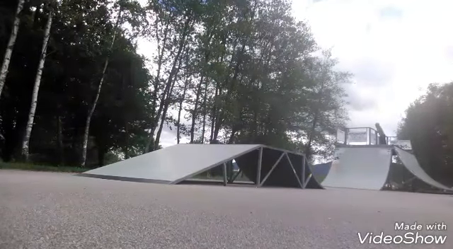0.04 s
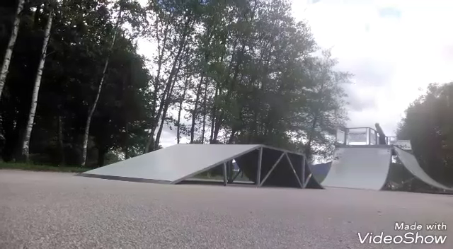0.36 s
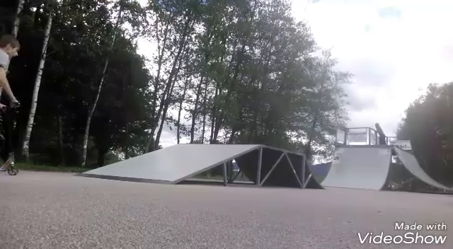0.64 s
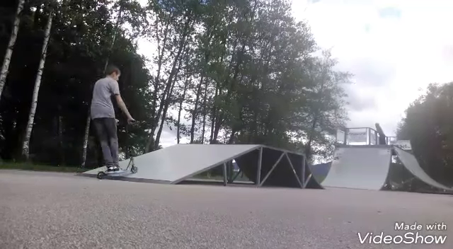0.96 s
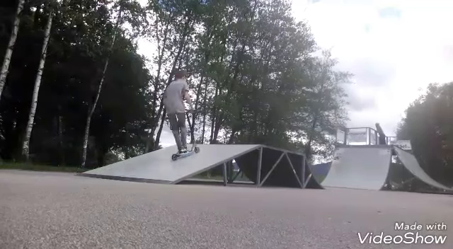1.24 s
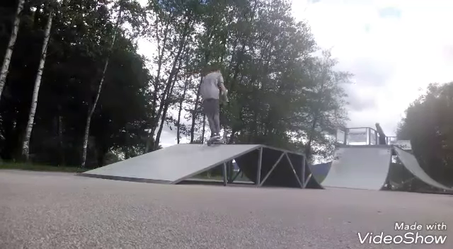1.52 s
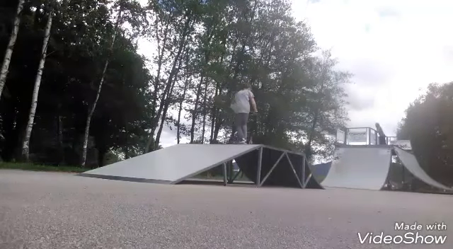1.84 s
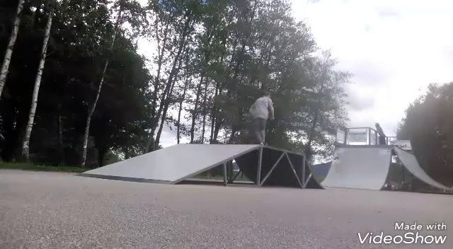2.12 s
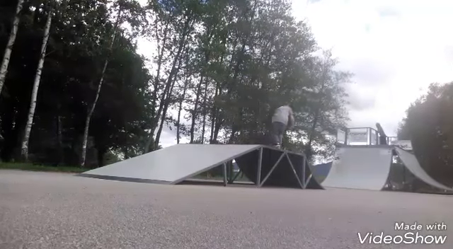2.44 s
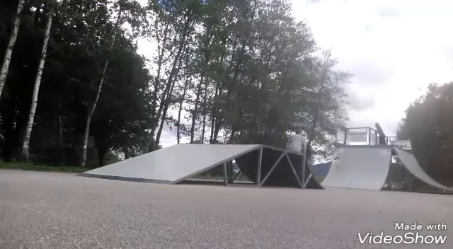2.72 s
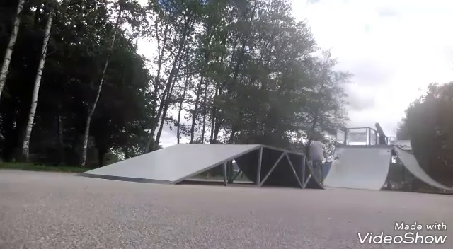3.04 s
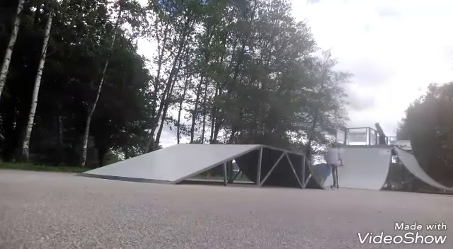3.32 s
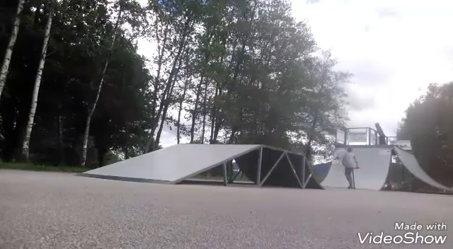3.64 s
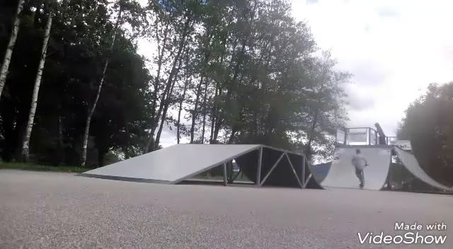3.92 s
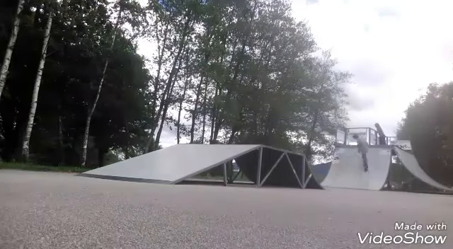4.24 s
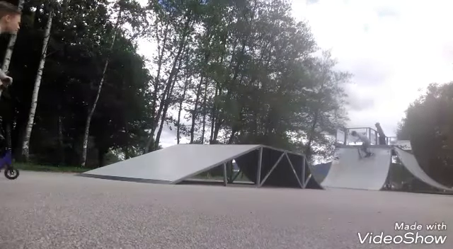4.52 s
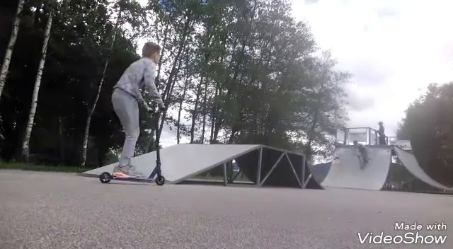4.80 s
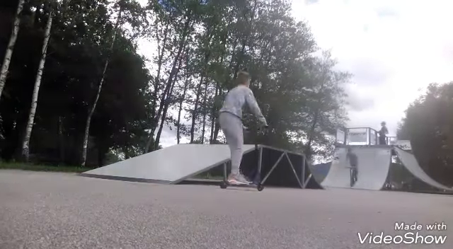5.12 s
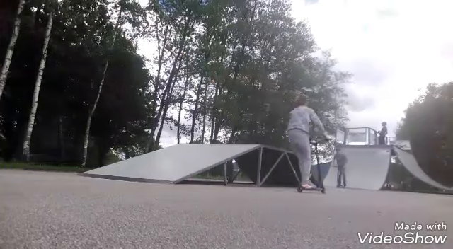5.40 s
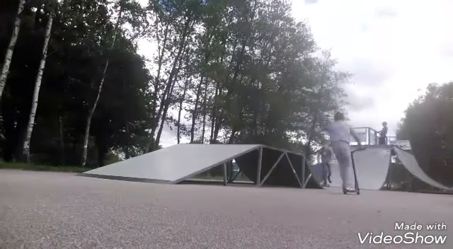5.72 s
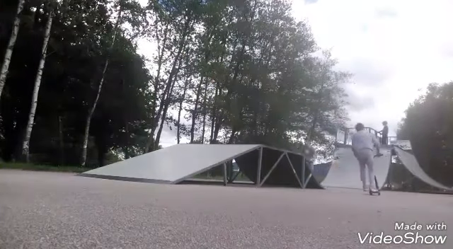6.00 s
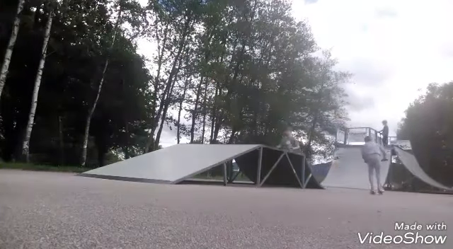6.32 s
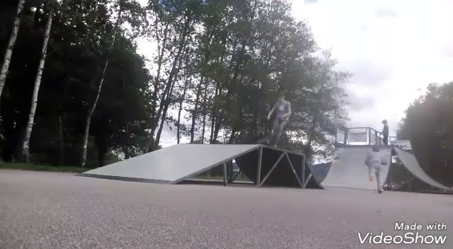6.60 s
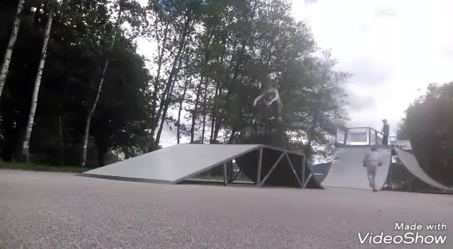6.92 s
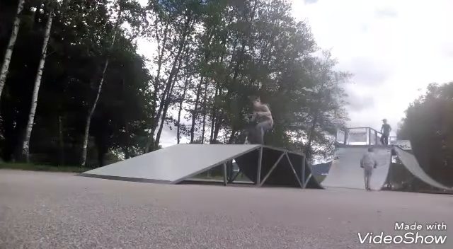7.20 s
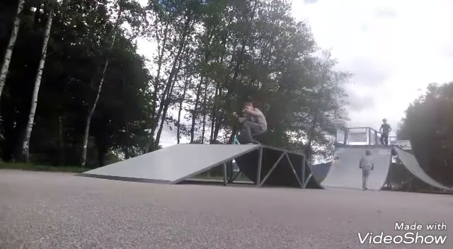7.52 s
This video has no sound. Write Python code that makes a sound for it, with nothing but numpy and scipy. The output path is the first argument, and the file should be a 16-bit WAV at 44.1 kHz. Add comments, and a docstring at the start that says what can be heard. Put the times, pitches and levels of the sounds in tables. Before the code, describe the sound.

Two kick scooters are heard from ground level at an outdoor skatepark, with quiet air and a faint echo. The first swishes in with a rising hiss at about 0.3 seconds and gives a sharp clack at 0.6. Its wheels crunch over grit and drum across a hollow ramp, knocking near 1.4 and 2.1 seconds. A cluster of heavy thuds comes around 3 seconds, then light metal clanks near 3.6. From 4 seconds a low rumble swells, with a sharp snap at 4.5, as the second scooter rolls close by, its loose metal parts rattling brightly on rough asphalt. A ramp booms at about 5 seconds. The rattle thins into a small, high jingle from 5.8 to 6.5 as the scooter leaves. Hollow thuds follow around 6.6, the rolling drops away briefly, and a last landing booms on the ramp at 7.5 seconds.

```python
"""Two kick scooters pass a listener at ground level in an outdoor skatepark.
The first swishes in with a rising sweep, clacks onto a hollow ramp, drums over its panels and
clanks onto a far ramp. From about 4 s the second rolls by close, rough asphalt rattling its
loose metal parts; a washer jingles as it leaves, and a last landing booms in a ramp.
Throughout, grit crunches under the wheels and the trees return a faint echo."""
import sys
import numpy as np
from scipy import signal
from scipy.fft import rfft, irfft, next_fast_len
from scipy.io import wavfile

SR = 44100
rng = np.random.default_rng(int(sys.argv[2]) if len(sys.argv) > 2 else 0)


def pcm_store(signal):
    """Save signal as 16-bit PCM."""
    levels = np.round(np.clip(np.atleast_2d(signal), -1, 1) * 32767)
    wavfile.write(sys.argv[1], SR, levels.astype(np.int16).T)


N = 333351
TIME = np.arange(N) / SR

# shaking of the second scooter on rough asphalt: time_s, level_db
SHAKING = [(4.4, -62), (4.52, -44.5), (4.67, -58), (4.82, -51.5), (5.15, -54), (5.27, -47), (5.65, -55),
           (5.77, -61), (6.0, -51), (6.15, -59.5), (6.27, -54.5), (6.8, -55.5), (7.2, -73.5), (7.5, -61)]
# modes of the ramp panels and of the loose metal parts: pitch_hz, level_db, t60_s
PANEL_MODES = [(55.6, -7.5, 0.45), (80.4, 1, 0.27), (104.2, -0.5, 0.18), (127.7, 0.5, 0.31),
               (159, 1.5, 0.11), (199.3, -0.5, 0.13), (242, -5, 0.18), (296, -6, 0.21), (344, -9, 0.14),
               (413, -8, 0.074), (506, -8, 0.081), (625, -12.5, 0.046), (869, -14.5, 0.04)]
METAL_MODES = [(3215, -6, 0.081), (3680, -10, 0.13), (4570, -2, 0.035), (4783, 0.5, 0.055), (5335, 6, 0.02),
               (5780, 5.5, 0.022), (6450, 3.5, 0.022), (6750, 4, 0.017), (7710, 8, 0.028),
               (8930, 6.5, 0.021), (9400, 1, 0.025), (10390, -2.5, 0.029)]
# spectra of hollow drumming and of a sharp snap: frequency_hz, level_db
DRUM_SPECTRUM = [(90, -13), (170, -3.5), (290, 0.5), (385, 2.5), (470, -2.5), (560, -10), (640, -9),
                 (740, -13), (1000, -11.5), (2000, -53.5)]
SNAP_SPECTRUM = [(800, 1.5), (2400, -5), (4200, -3.5), (5500, 2), (7500, -4.5), (9500, -8.5), (12000, -9.5),
                 (14000, -66.5)]


def gain_of(db):
    """Amplitude grows tenfold for every 20 dB."""
    return 10 ** (np.asarray(db) / 20)


def unit_rms(x):
    """Normalisation to rms 1."""
    return x / np.sqrt(np.mean(x ** 2) + 1e-20)


def unit_peak(x):
    """Normalisation to peak 1."""
    return x / (abs(x).max() + 1e-20)


def value_at(points, hz):
    """Interpolation on a log-frequency axis."""
    known_hz, value = np.transpose(points)
    return np.interp(np.log(hz + 1), np.log(known_hz + 1), value)


def envelope(points):
    """Interpolation of a dB curve into a gain, with exponential decay outside its span."""
    time_s, db = np.transpose(points)
    outside_s = abs(TIME - np.clip(TIME, time_s[0], time_s[-1]))
    return gain_of(np.interp(TIME, time_s, db) - 270 * outside_s)


def add(mix, start_s, sound):
    """Superposition: a sound joins the mix at start_s."""
    part = mix[max(round(start_s * SR), 0):][:len(sound)]
    part += sound[:len(part)]


def colour(x, spectrum):
    """Minimum-phase filtering shapes the spectrum and leaves clicks their sharp front."""
    log_gain = np.log(gain_of(value_at(spectrum, abs(np.fft.fftfreq(4096, 1 / SR)))))
    taps = np.fft.ifft(np.exp(np.conj(signal.hilbert(log_gain)))).real
    return signal.oaconvolve(x, taps[:len(taps) // 2])[:len(x)]


def wander(rate_hz):
    """Low-passed noise: a smooth random drift of rms 1."""
    size = next_fast_len(N, True)
    hz = np.fft.rfftfreq(size, 1 / SR)
    spectrum = rfft(rng.standard_normal(size)) / (1 + (hz / rate_hz) ** 4)
    return unit_rms(irfft(spectrum, size)[:N])


def grains(per_s, spread_db):
    """A Poisson process of clicks of either sign: many small, a few large."""
    size = gain_of(spread_db * np.minimum(rng.exponential(1, N), 3.5))
    return size * rng.choice([-1, 1], N) * (rng.random(N) < per_s / SR)


def burst(t60_s, rise_s=0.00055):
    """A noise transient with a quick rise and exponential decay."""
    t = np.arange(SR // 4) / SR
    return rng.standard_normal(len(t)) * gain_of(-60 * t / t60_s) * (1 - np.exp(-t / rise_s))


def ring(modes, tilt_db=0, scatter_db=2, detune=0.02):
    """Free vibration of damped modes; each contact point weights and tunes them differently."""
    hz, db, t60_s = np.transpose(modes)[:, :, None]
    weight, shift, sign = rng.standard_normal((3, len(modes), 1))
    t = np.arange(SR // 3) / SR
    db = db + tilt_db * np.log2(hz / hz[0]) + scatter_db * weight - 60 * t / t60_s
    return (np.sign(sign) * gain_of(db) * np.sin(2 * np.pi * hz * (1 + detune * shift) * t)).sum(0)


def chink(modes, tick_db, tick_t60_s):
    """Impact of metal on metal: a broadband tick and a short modal ring."""
    tick = unit_peak(colour(burst(tick_t60_s), SNAP_SPECTRUM))
    tone = unit_peak(ring(modes, detune=0.009))
    return unit_peak(tone[:len(tick)] + gain_of(tick_db) * tick)


def shaken(blow, per_s, spread_db, drift_db, drift_hz, contacts=3):
    """Random excitation at several contact points; their strengths drift, so the resonances shift."""
    out = np.zeros(N)
    for _ in range(contacts):
        impacts = grains(per_s, spread_db) * gain_of(drift_db * wander(drift_hz))
        out += signal.oaconvolve(impacts, unit_peak(blow()))[:N]
    return unit_rms(out)


def still_air(level_db=-64.5):
    """Ambient noise: steady, and strongest in the bass."""
    # frequency_hz, level_db
    spectrum = [(25, 8), (60, 8), (250, -19), (600, -18), (1800, -70.5), (7000, -35.5), (13000, -46)]
    return gain_of(level_db) * unit_rms(colour(rng.standard_normal(N), spectrum))


def tree_echo(x, rise_s=0.0013):
    """Scattering from trunks and ramps gives a diffuse tail, each band dying at its own rate."""
    # reverberation times: frequency_hz, t60_s
    decay_times = [(80, 0.56), (500, 0.43), (2000, 0.31), (6000, 0.35), (12000, 0.49)]
    hz, t, noise = signal.stft(rng.standard_normal(SR // 2), SR, nperseg=256)
    decay = gain_of(-60 * t / value_at(decay_times, hz)[:, None])
    tail = signal.istft(noise * decay * (1 - np.exp(-t / rise_s)), SR, nperseg=256)[1]
    return signal.oaconvolve(x, tail / np.linalg.norm(tail))[:N]


def reflections(x, echo_db=-9):
    """Comb filtering: paths off ground and ramps change as the rider moves, so the peaks slide."""
    delays_s = np.geomspace(0.0012, 0.005, 4)
    late = sum(np.interp(TIME - delay * np.exp(0.14 * wander(1.5)), TIME, x) for delay in delays_s)
    return (x + gain_of(echo_db) * late) / np.sqrt(1 + len(delays_s) * gain_of(echo_db) ** 2)


def nearness(nearest_s=5.21, pass_s=0.62):
    """Spherical spreading: the second scooter's gain goes as one over distance, 1 at its nearest."""
    return 1 / np.hypot(1, (TIME - nearest_s) / pass_s)


def wheel_load(start_s, rise_s, hold_s, fade_s=0.088, fade_power=2.45):
    """The load on the wheels rises linearly, holds, then decays by a power law."""
    released_s = np.maximum(TIME - start_s - rise_s - hold_s, 0)
    return np.clip((TIME - start_s) / rise_s, 0, 1) / (1 + released_s / fade_s) ** fade_power


def contact_gains(passing_db=-8, rough_until_s=6.8):
    """Incoherent sources add in power: light rolling, hard stretches and the passing scooter."""
    # light rolling, which stops at take-off: time_s, level_db
    coasting = [(0, -54.5), (.15, -55.5), (1.1, -49), (1.85, -56), (2.0, -51), (2.3, -58.5), (3.9, -55.5),
                (4.6, -51.5), (5.8, -57), (6.85, -60.5), (7.05, -86)]
    # wheels bearing hard: start_s, rise_s, hold_s, hiss_db, crunch_db, drum_db, boom_db, rumble_db
    stretches = [(0.251, 0.24, 0.13, -55, -53.5, -59.5, -61, -72),
                 (1.098, 0.15, 0.055, -56.5, -59.5, -75, -75, -61),
                 (1.336, 0.046, 0.082, -69.5, -74, -55, -56, -53),
                 (1.588, 0.026, 0.11, -66, -68, -61, -75, -48.5),
                 (2.06, 0.014, 0.029, -63.5, -62.5, -50, -55.5, -52),
                 (2.368, 0.076, 0.068, -76.5, -74, -69, -53.5, -42),
                 (2.983, 0.033, 0.2, -61, -58.5, -53.5, -45.5, -51),
                 (3.55, 0.013, 0.3, -72.5, -74, -72, -84, -58),
                 (3.993, 0.59, 0.016, -56.5, -57, -63.5, -47.5, -37.5),
                 (5.045, 0.027, 0.092, -60, -64, -46.5, -49.5, -49),
                 (5.358, 0.25, 0.04, -55, -58.5, -59.5, -48, -58),
                 (6.593, 0.027, 0.15, -63.5, -57, -48.5, -45, -38.5),
                 (7.494, 0.018, 0.039, -53, -57, -45, -53, -39.5)]
    coasting_db = [-38, -27, -11, -13, 0]  # the same five layers
    power = np.outer(gain_of(coasting_db), envelope(coasting)) ** 2
    for start_s, rise_s, hold_s, *layers_db in stretches:
        power += np.outer(gain_of(layers_db), wheel_load(start_s, rise_s, hold_s)) ** 2
    hiss, crunch, drum, boom, rumble = np.sqrt(power)
    passing = gain_of(passing_db) * envelope(SHAKING) * nearness() * (TIME < rough_until_s)
    return hiss, np.hypot(crunch, passing), drum, boom, rumble


def rolling(rumble_db=-5, deck_db=-7.5, frame_db=-3, boom_db=-1, crunch_db=-2, hiss_db=1):
    """Roughness excitation: stones shake ground, deck, frame and panels; grit crunches and hisses."""
    # spectra of the ground and of coarse and fine grit: frequency_hz, level_db
    rumble_spectrum = [(20, -49.5), (33, -13.5), (48, 5.5), (62, 3), (90, -0.5), (130, -11.5), (190, -18.5),
                       (600, -81)]
    crunch_spectrum = [(450, -7.5), (900, 0), (1500, 0.5), (2100, -5.5), (2650, -5.5), (3400, -13.5),
                       (6000, -42)]
    hiss_spectrum = [(1200, -23), (2600, -2), (3300, -3.5), (4150, -0.5), (4900, -3), (5700, -1.5),
                     (6700, 3), (7700, 0.5), (8700, -7.5), (10500, -15.5), (12000, -20), (14000, -60)]
    # hollow tones of the frame: pitch_hz, level_db, t60_s
    frame_modes = [(165, -0.5, 0.12), (272.8, 0.5, 0.071), (387.8, -4, 0.16), (540.3, -6.5, 0.081),
                   (717, -3.5, 0.08), (1014, -10.5, 0.073)]
    bumps = gain_of(4.5 * wander(12))
    flutter = gain_of(1.6 * wander(45))
    hiss_gain, crunch_gain, drum_gain, boom_gain, rumble_gain = contact_gains()
    rumble = unit_rms(colour(grains(400, 4.7), rumble_spectrum) * bumps) * rumble_gain
    deck = unit_rms(colour(grains(700, 4.6) * np.sqrt(bumps), DRUM_SPECTRUM))
    frame = shaken(lambda: ring(frame_modes, scatter_db=3.5, detune=0.036),
                   per_s=200, spread_db=4, drift_db=6, drift_hz=5.4)
    drum = (gain_of(deck_db) * deck + gain_of(frame_db) * frame) * drum_gain
    boom = shaken(lambda: ring(PANEL_MODES, scatter_db=3, detune=0.037),
                  per_s=70, spread_db=3, drift_db=3.8, drift_hz=5.5) * boom_gain
    crunch = unit_rms(colour(grains(1500, 3.7), crunch_spectrum) * flutter) * crunch_gain
    hiss = unit_rms(colour(grains(6000, 4), hiss_spectrum) * flutter) * hiss_gain
    grit = reflections(gain_of(crunch_db) * crunch + gain_of(hiss_db) * hiss)
    return gain_of(rumble_db) * rumble + drum + gain_of(boom_db) * boom + grit


def wheel_swishes(taper=0.44):
    """Narrow-band noise has a pitch: gliding bands of wheel noise give swishes, hums and whines."""
    # start_s, length_s, first_hz, last_hz, level_db, width_hz
    swishes = [(0.298, 0.2, 1258, 1680, -51.5, 200), (0.33, 0.36, 2900, 3700, -60, 600),
               (0.41, 0.12, 4300, 4000, -61, 450), (0.359, 0.35, 440, 500, -61, 130),
               (0.423, 0.14, 1300, 1613, -49.5, 710), (0.45, 0.149, 1800, 2020, -55, 160),
               (0.03, 0.84, 320, 375, -63.5, 45), (0.34, 0.49, 2740, 2486, -73, 350),
               (1.608, 0.18, 1040, 805, -55.5, 230), (1.607, 0.18, 2600, 2000, -63, 2200),
               (2.12, 0.16, 7200, 6900, -72, 2200), (2.38, 0.28, 7200, 7000, -77, 2100),
               (2.3, .62, 3520, 3700, -87.5, 240), (4.122, 0.212, 333, 240, -55.5, 44),
               (4.316, 0.15, 379.6, 300, -55, 21), (5.355, 0.29, 1523, 1682, -59, 420)]
    out = np.zeros(N)
    for start_s, length_s, first_hz, last_hz, db, width_hz in swishes:
        hz = np.linspace(first_hz, last_hz, round(length_s * SR))
        noise = rng.standard_normal(2 * SR) + 1j * rng.standard_normal(2 * SR)
        lowpass = signal.butter(2, width_hz / 2, fs=SR, output="sos")
        baseband = signal.sosfilt(lowpass, noise)[SR // 2:][:len(hz)]
        band = unit_rms((baseband * np.exp(2j * np.pi * np.cumsum(hz) / SR)).real)
        add(out, start_s, gain_of(db) * band * signal.windows.tukey(len(hz), taper))
    return out


def wheel_dips(bump_hz=72, length_s=0.054):
    """A forced pulse without ring: a wheel drops into a dip and pushes for a few low cycles."""
    # start_s, level_db
    bumps = [(0.093, -48.5), (1.125, -39.5), (1.428, -43), (1.989, -41.5), (2.493, -38.5), (2.545, -39.5),
             (2.85, -39.5), (3.295, -37), (7.425, -46.5)]
    out = np.zeros(N)
    t = np.arange(0, length_s, 1 / SR)
    window = np.sin(np.pi * np.sqrt(t / length_s)) ** 2
    for start_s, db in bumps:
        push = np.sin(2 * np.pi * bump_hz * rng.uniform(0.85, 1.15) * t)
        add(out, start_s, gain_of(db) * push * window)
    return out


def fork_clanks():
    """Impact excitation: fork and bars ring as the first scooter meets the far ramp."""
    # start_s, peak_db
    clanks = [(3.574, -42), (3.58, -43), (3.619, -47), (3.632, -49.5), (3.689, -40)]
    # pitch_hz, level_db, t60_s
    fork_modes = [(1230, -7.5, .1), (1625, -14, .07), (3230, -4.5, 0.099), (3750, -2.5, .07),
                  (4650, 2.5, .06), (5000, -9, .07), (5230, 0, 0.074), (5730, -2.5, 0.068),
                  (7870, 3, 0.067), (8720, 5, 0.077), (9700, -8, .03)]
    out = np.zeros(N)
    for start_s, db in clanks:
        add(out, start_s, gain_of(db) * chink(fork_modes, tick_db=-5, tick_t60_s=0.06))
    return out


def ramp_thuds(clatter_db=-13, clatter_t60_s=0.17):
    """Plate vibration: panels boom and joints clatter; harder blows favour the higher modes."""
    # blows on the hollow ramps: start_s, peak_db, hardness_db_per_octave
    blows = [(.445, -40, -3), (.6, -40.5, -1.5), (0.907, -41.5, -7), (1.32, -35.5, -11), (1.366, -38, 1),
             (1.402, -32, -5), (2.079, -33, 3), (2.1, -37, -2), (2.377, -48.5, -2.5), (2.605, -44.5, 1),
             (2.935, -43.5, 1.5), (2.992, -29, 4), (3.032, -27.5, -3), (3.086, -27.5, 0), (3.131, -32, 1),
             (3.181, -27.5, -1), (3.59, -43.5, -4.5), (4.515, -35, -4.5), (4.691, -34.5, -8.5),
             (5.0491, -28, 6.5), (5.062, -29, 5), (5.083, -36.5, -11), (5.56, -38, -6.5), (6.525, -29, 4),
             (6.546, -32.5, -4), (6.613, -29.5, -1.5), (6.634, -30.5, 5), (6.76, -39, 5), (7.511, -26, 2.5),
             (7.519, -29, 9)]
    out = np.zeros(N)
    for start_s, db, hardness_db in blows:
        clatter = unit_peak(colour(burst(clatter_t60_s), DRUM_SPECTRUM))
        boom = unit_peak(ring(PANEL_MODES, hardness_db, scatter_db=1.5, detune=0.04))
        add(out, start_s, gain_of(db) * boom)
        add(out, start_s, gain_of(db + clatter_db + hardness_db) * clatter)
    return out


def deck_clacks(bounce_s=0.0059, loss_db=2, snap_t60_s=0.034, snap_loss_db=3):
    """Inelastic rebound: a wheel hits an edge and rings the deck in quick, weakening bounces."""
    # start_s, clack_db, snap_db
    strikes = [(0.592, -26.5, -37.5), (1.366, -35.5, -41), (2.072, -56, -50.5), (2.09, -44, -50.5),
               (2.598, -53.5, -58.5), (3.082, -41, -36), (2.992, -49, -58.5), (3.18, -44, -45),
               (4.509, -34, -26), (5.064, -41.5, -36), (7.511, -49, -59), (7.524, -56, -44)]
    # pitch_hz, level_db, t60_s
    deck_modes = [(954, -4, 0.0095), (1220, -13.5, 0.19), (1320, 1, 0.025), (1535, -1, 0.037),
                  (1720, 2.5, 0.024), (1840, 1.5, 0.019), (2680, -5.5, 0.019)]
    out = np.zeros(N)
    for start_s, clack_db, snap_db in strikes:
        for k in range(5):
            at_s = start_s + k * bounce_s * rng.uniform(0.94, 1.06)
            fall_db = loss_db * k * (k + 1) / 2
            clack = unit_peak(ring(deck_modes, detune=0.04))
            snap = unit_peak(colour(burst(snap_t60_s), SNAP_SPECTRUM))
            add(out, at_s, gain_of(clack_db - fall_db) * clack)
            add(out, at_s, gain_of(snap_db - snap_loss_db * k) * snap)
    return out


def wheel_beat(turn_hz=16, depth_db=4):
    """Amplitude modulation: the shaking swells once with every turn of the wheels."""
    return gain_of(depth_db * np.sin(2 * np.pi * turn_hz * TIME + wander(1.6)))


def chatter(typical_per_s=150):
    """Driven bouncing: a loose part gives uneven impulses, stronger at each turn of the wheels."""
    bounce_count = np.floor(np.cumsum(typical_per_s * np.exp(0.5 * wander(90))) / SR)
    return np.diff(bounce_count, prepend=0) * wheel_beat()


def washer(bounces):
    """Modal ringing at every bounce; the washer turns on its bolt, so its overtones vary in strength."""
    # pitch_hz, level_db, t60_s
    washer_modes = [(5070, -9.5, 0.06), (6510, -10, 0.088), (6650, 5.5, 0.093), (7920, 2.5, 0.04),
                    (8890, 5, 0.023), (9300, -2, 0.066)]
    # jingling as the second scooter rolls away: time_s, level_db
    jingle = [(5.78, -69), (5.9, -56), (6.02, -53), (6.15, -67), (6.27, -54.5), (6.35, -70), (6.53, -56),
              (6.64, -89)]
    out = np.zeros(N)
    for _ in range(4):
        impacts = bounces * gain_of(3 * wander(20))
        out += signal.oaconvolve(impacts, ring(washer_modes, detune=0.003))[:N]
    return envelope(jingle) * unit_rms(out)


def jolts(bounce_s=0.002, loss_db=6):
    """Damped rebound: a larger stone throws a loose part against its seat, where it bounces."""
    # start_s, level_db
    stones = [(3.027, -33.5), (4.446, -33.5), (4.461, -48), (4.638, -35), (4.701, -36), (4.722, -37),
              (4.729, -29.5), (4.752, -40), (4.764, -39), (4.782, -29), (4.799, -30.5), (4.812, -37),
              (4.869, -30), (4.929, -35), (4.965, -34.5), (4.991, -34), (5.223, -35), (5.412, -35),
              (5.578, -38.5), (6.004, -34), (6.208, -41), (6.259, -38.5), (6.468, -38.5), (7.028, -47.5),
              (7.28, -50)]
    out = np.zeros(N)
    for start_s, db in stones:
        for k in range(3):
            at_s = start_s + k * bounce_s * rng.uniform(0.8, 1.2)
            add(out, at_s, gain_of(db - loss_db * k) * chink(METAL_MODES, tick_db=-2, tick_t60_s=0.02))
    return out


def metal_rattle(taps_db=-2, chatter_db=-5, grit_db=-4, lowest_hz=2800):
    """Temporal fusion: rough asphalt keeps loose parts tapping so densely that they sizzle."""
    taps = shaken(lambda: chink(METAL_MODES, tick_db=-2, tick_t60_s=0.04),
                  per_s=160, spread_db=2.2, drift_db=3, drift_hz=14, contacts=6)
    bounces = chatter()
    bouncing = signal.oaconvolve(bounces, chink(METAL_MODES, tick_db=1.5, tick_t60_s=0.016))[:N]
    grit = colour(grains(3500, 4), SNAP_SPECTRUM) * wheel_beat()
    close_by = gain_of(chatter_db) * unit_rms(bouncing) + gain_of(grit_db) * unit_rms(grit)
    sizzle = gain_of(taps_db) * unit_rms(taps * wheel_beat())
    rattle = envelope(SHAKING) * (sizzle + nearness() * close_by)
    metal = reflections(rattle, echo_db=-10) + washer(bounces) + jolts()
    # such small parts radiate almost nothing in the lower mids
    return signal.sosfilt(signal.butter(8, lowest_hz, "highpass", fs=SR, output="sos"), metal)


def scene(echo_db=-13):
    """Interaural phase: all is near the centre, but changing paths jitter it and widen the treble."""
    # side against mid: frequency_hz, level_db
    width = [(60, -30.5), (250, -19), (1000, -11.5), (2500, -9.5), (10000, -4)]
    scooters = (rolling() + wheel_swishes() + ramp_thuds() + wheel_dips()
                + deck_clacks() + fork_clanks() + metal_rattle())
    mid = scooters + still_air() + gain_of(echo_db) * tree_echo(scooters)
    quadrature = signal.hilbert(mid, next_fast_len(N)).imag[:N]
    side = colour(quadrature * wander(70), width)
    return np.array([mid + side, mid - side])


def record(dry, edge_hz=14000):
    """Frequency response: the deep bass is cut away and the microphone dulls the top treble; a low-pass ends
    the band."""
    # frequency_hz, gain_db
    response = [(18, -13.0), (38, 0.5), (10400, -1.0), (11800, -13.0), (14000, -4.5)]
    dulled = np.array([colour(channel, response) for channel in dry])
    lowpass = signal.firwin(511, edge_hz, window=("kaiser", 9), fs=SR)
    return signal.oaconvolve(dulled, lowpass[None], "same")


dry = scene()
out = record(dry)
pcm_store(out)
```